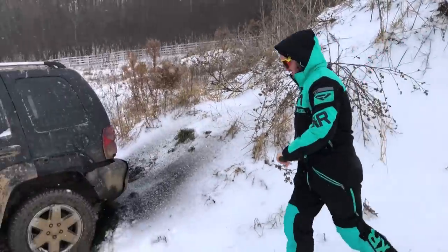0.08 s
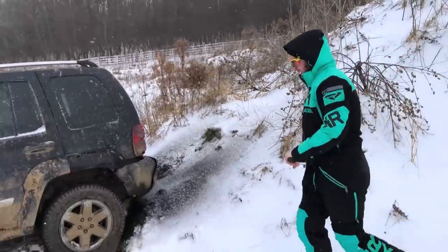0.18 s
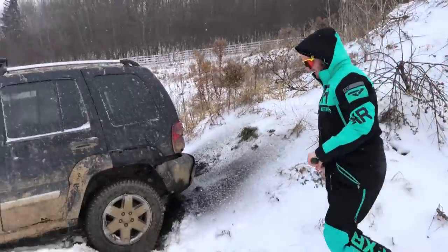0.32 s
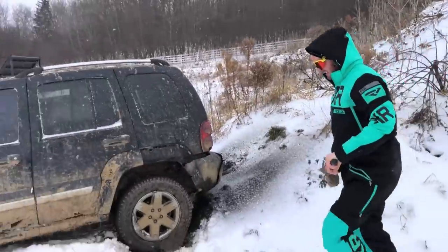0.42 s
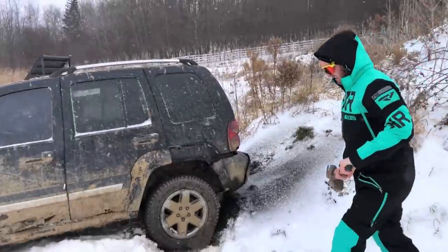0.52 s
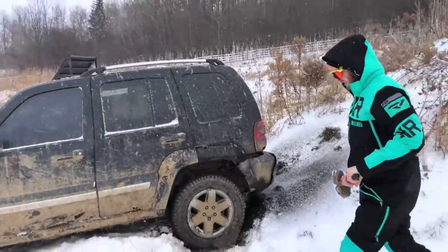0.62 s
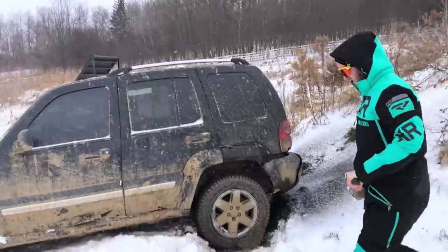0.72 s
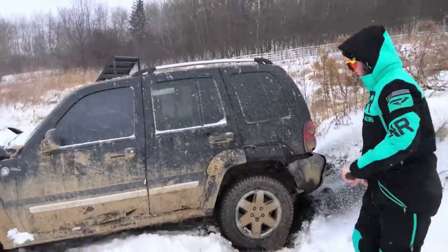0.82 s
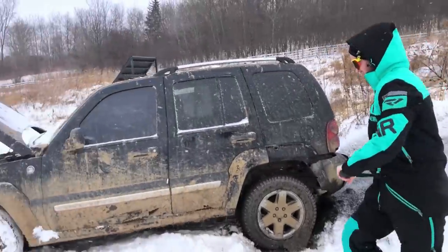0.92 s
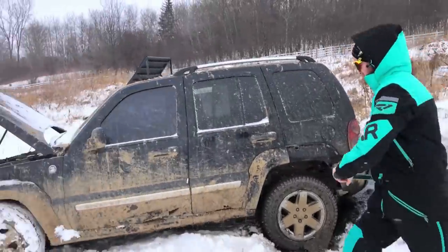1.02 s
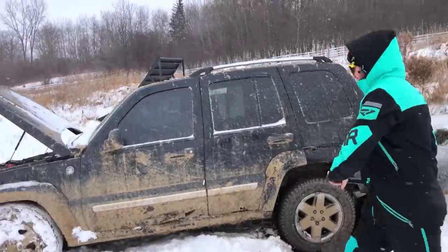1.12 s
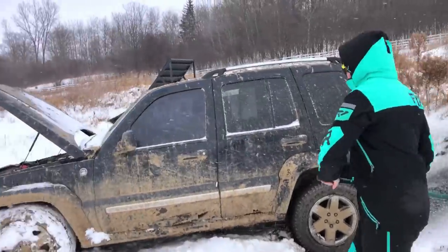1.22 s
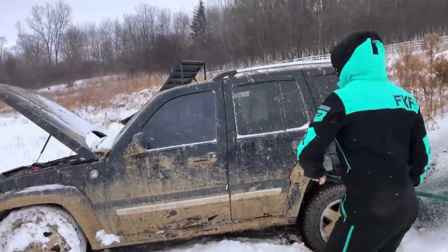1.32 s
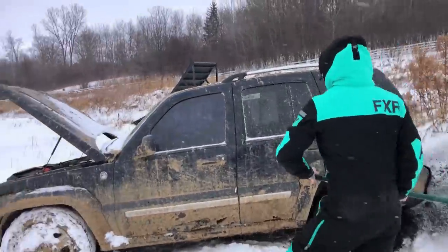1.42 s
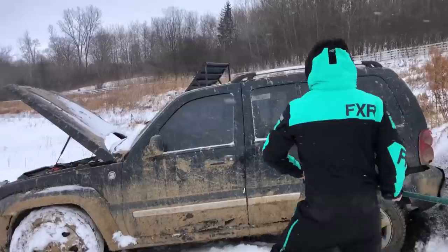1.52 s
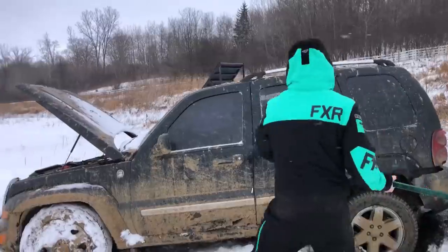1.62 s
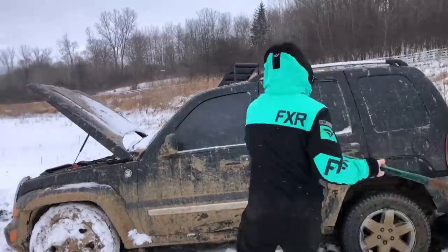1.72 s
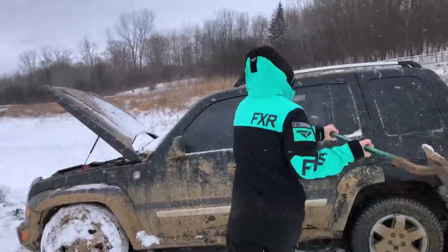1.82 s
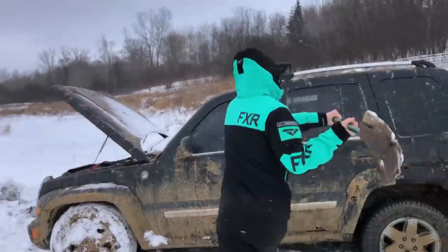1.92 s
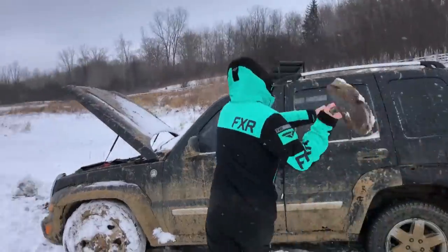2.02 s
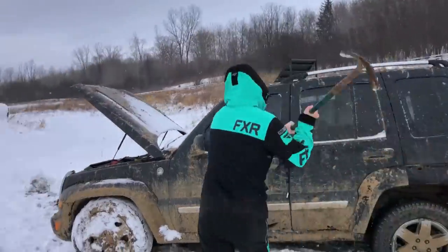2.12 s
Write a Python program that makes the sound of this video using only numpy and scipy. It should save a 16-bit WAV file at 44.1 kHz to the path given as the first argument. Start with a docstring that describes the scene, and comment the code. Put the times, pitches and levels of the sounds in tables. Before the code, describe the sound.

Boots crunch and creak through packed snow close by while an engine hums and whirrs outdoors

```python
"""Boots tread packed snow close by, while an engine runs throughout with a low hum and a throbbing whirr
that slowly grows louder. The snow gives way in creaking slips (short damped oscillations) over many small
collapsing grains (filtered random impulses), with low thuds, bass rumble and a faint hiss of loose powder.
A snowsuit swishes, ticks and squeaks (shaped noise and faint rings). The engine sums sines for its hum
with noise and noise-driven resonances for its whirr and whine. All is outdoors, without echo."""
import sys
import numpy as np
from scipy import signal
from scipy.fft import rfft, irfft
from scipy.io import wavfile
from scipy.ndimage import uniform_filter1d

SR = 44100
rng = np.random.default_rng(int(sys.argv[2]) if len(sys.argv) > 2 else 0)


def unload_wav(signal):
    """Save mono or channel-first audio to the path in sys.argv[1] as 16-bit WAV at rate SR, clipped to [-1, 1]."""
    wavfile.write(
        sys.argv[1],
        SR,
        np.round(np.clip(np.atleast_2d(signal).T, -1, 1) * 32767).astype(np.int16),
    )


N = 97020  # length in samples

# Partials of the engine hum: pitch_hz, rms_level_db
HUM_PARTIALS = [(62.8,-42),(94,-40.5),(137,-52.5),(275,-52),(502,-55.5)]
# Spectrum of the whirr's broad noise: frequency_hz, relative_level_db
WHIRR_SPECTRUM = [(65, 0.5), (110, -2), (188, -7.5), (274, -7.5), (358, -8.5), (499, -3), (666, -13),
                  (739, -8.5), (1140, -7), (1290, -12), (1400, -6.5), (1760, -11), (3420, -21),
                  (10900, -36), (15500, -51)]
# Narrow resonances in the whirr, before its slow rise and throb: pitch_hz, rms_level_db
WHIRR_RINGS = [(1136,-51.5),(1470,-56),(1653,-61.5),(1810,-52),(2050,-55.5),(2290,-56),(2541,-60),(2717,-61.5),(3098,-60.5)]
# Thin whine above the whirr, before the same rise and throb: pitch_hz, rms_level_db
WHINE_RINGS = [(6035,-83),(8592,-67.5)]
# Slow rise of whirr and whine: time_s, gain_db
WHIRR_RISE = [(0,-7),(.3,-5.5),(.6,-4),(1.0,-3),(1.4,-1),(1.8,0),(2.2,0.5)]

# Swishes of cloth, before the grain of the weave: centre_s, width_s, level_db
SWISHES = [(.432,0.0066,-45.5),(0.529,0.0041,-46),(.95,0.015,-51),(1.322,0.016,-45),(1.9042,0.002,-37),(1.921,0.011,-37),(2.16,0.072,-56)]
# Spectrum of the rubbing cloth: frequency_hz, relative_level_db
CLOTH_SPECTRUM = [(1200,-5),(2200,8.5),(2900,11.5),(4000,5.5),(5800,2),(8000,-0.5),(12000,-2),(15500,-16)]
# Spectrum of the small tick: frequency_hz, relative_level_db
TICK_SPECTRUM = [(2500,-14),(5500,-10),(8500,2),(11000,-6),(15500,-6)]
# Squeaks of cloth: peak_s, peak_level_db, pitch_hz
SQUEAKS = [(.143,-56,8900),(.69,-45,4460),(1.916,-42,5960),(1.921,-34.5,3050)]

# Level of the bass rumble under the steps: time_s, level_db
RUMBLE_LEVEL = [(0,-39),(.3,-39.5),(.7,-26.5),(1.08,-25),(1.2,-33),(1.3,-51.5),(1.6,-28.5),(1.75,-76),(2.2,-65)]
# Spectrum of the rumble: frequency_hz, relative_level_db
RUMBLE_SPECTRUM = [(20,-60),(40,-3.5),(65,0),(95,-1),(150,5.5),(400,-61.5)]
# Low thuds of the boots: peak_s, peak_level_db, pitch_hz
THUDS = [(.14,-22.5,74),(.37,-25.5,64.6),(.515,-22,63.7),(.585,-18.5,86),(.733,-13,77)]
# Airy hiss of loose snow kicked up by a boot: time_s, level_db
POWDER_LEVEL = [(.34,-85),(.39,-55),(.44,-55),(.54,-55.5),(.60,-63)]
# Spectrum of the powder: frequency_hz, relative_level_db
POWDER_SPECTRUM = [(3000,-18),(6000,-4),(12000,-2.5),(15500,-12)]
# Weight on the snow, as grain level before the lift GRAIN_DB: time_s, level_db
TREAD_WEIGHT = [(0,-47),(.19,-42.5),(.275,-31),(.35,-42.5),(.40,-34.5),(.49,-38.5),(.62,-32),(.70,-30),(.78,-24),(.90,-32),(.94,-26),(1.0,-29.5),
                (1.11,-23.5),(1.165,-25),(1.235,-26),(1.255,-42.5),(1.35,-46.5),(1.38,-38.5),(1.41,-49),(1.52,-50),(1.55,-29),(1.62,-61),(1.665,-41),(1.71,-60),(2.2,-50)]
# Spectrum of the grains, muffled by the snow above them: frequency_hz, relative_level_db
GRAIN_SPECTRUM = [(50,-32.5),(100,-15),(160,0),(260,-6.5),(520,-7.5),(800,-20.5),(1300,-28),(2200,-39.5),(5000,-103)]
# Strongest slips of the snow, before the muffling: peak_s, fundamental_level_db, pitch_hz
SLIPS = [(.2015,-14,580),(.232,-15.5,440),(.2708,-10,348),(.2801,-13.5,560),(.2845,-17,448),(.295,-32,520),(.317,-18,414),
         (.378,-24,480),(.385,-10.5,444),(.4034,-12.5,304),(.4118,-10,283),
         (.4389,-17.5,556),(.451,-14,217),(.4611,-16.5,350),(.5345,-16,320),(.556,-19,495),(.5765,-15,473),(.6085,-26,412),(.6121,-9.5,650),(.626,-15,265),
         (.6424,-16.5,443),(.6675,-20,403),(.7163,-10,710),(.724,-14.5,407),(.7309,-11,476),
         (.7475,-18,377),(.759,-10.5,228),(.773,-9.5,290),(.7856,-6.5,225),(.7961,-8,510),(.813,-15,460),(.8335,-15.5,347),(.845,-12,457),(.9255,-20.5,330),(.941,-7,228),
         (.979,-12,368),(1.0125,-9,417),(1.022,-7,231),(1.037,-17,850),(1.0401,-5.5,423),(1.045,-7.5,515),(1.0552,-5.5,660),(1.0595,-6,560),(1.0682,-10,272),(1.086,-5.5,533),(1.0983,-22,300),(1.1079,-7,444),
         (1.1151,-2.5,273),(1.1283,-10,208),(1.1517,-3.5,340),(1.1812,-6.5,516),(1.1923,-3.5,724),(1.1945,-8.5,1470),(1.196,-5,680),(1.203,-14,410),(1.2245,-8,194),(1.2369,-8.5,201),
         (1.378,-22,260),(1.5368,-12,287),(1.5454,-16,354),(1.5628,-16.5,210),(1.5777,-12,246),(1.5845,-9,313),(1.6098,-21,296),(1.655,-19.5,209),(1.6665,-20,231)]

WHIRR_DB, RING_WIDTH_HZ, THROB_DEPTH = -35.5, 16, 0.2
CLOTH_GRAIN_S, CLOTH_GRAIN_DB = 0.00067, 2.7
TICK_S, TICK_DB, TICK_DECAY_S = 0.4235, -32, 0.0022
SQUEAK_CYCLES, SQUEAK_ROUGH = 26, 0.04  # rise and decay; unevenness of pitch as a share
THUD_RISE_CYCLES, THUD_DECAY_CYCLES = 0.72, 0.58
POWDER_SPREAD_DB = 3.5  # unequal sizes of the falling crystals
GRAINS_PER_S, GRAIN_SPREAD_DB, GRAIN_DB = 2000, 4, 6.5
SLIP_RISE_CYCLES, SLIP_DECAY_CYCLES = 0.581, 0.94
SLIP_SAG, SLIP_ROUGH = 0.19, 0.19  # fall and unevenness of pitch, as shares
SLIP_EDGE_DB = -10.5  # octave overtone at the instant of breaking
SLIP_BODY_DB = -9.5  # the pack of snow gives way an octave below each slip
MUFFLE_HZ = 1470  # the snow above dulls the slips
LOW_CUT_HZ, TOP_HZ = 49, 15650


def undb(db):
    """Amplitude ratio from level: each 20 dB is a factor of ten."""
    return 10 ** (np.asarray(db) / 20)


def times():
    """Sampling principle: sample n lies at n / SR seconds."""
    return np.arange(N) / SR


def fader(points):
    """Gain that follows straight lines in decibels between (time_s, level_db) points."""
    time_s, level_db = np.array(points).T
    return undb(np.interp(times(), time_s, level_db))


def colour(x, points):
    """Minimum-phase filtering: a folded cepstrum makes the spectrum causal; the result has rms 1."""
    hz, db = np.array(points).T
    f = np.maximum(np.arange(N // 2 + 1) * SR / N, 1)
    gain = undb(np.interp(np.log(f), np.log(hz), db))
    gain = gain / np.sqrt(1 + (hz[0] / 2 / f) ** 4)  # roll-off an octave below the first point
    cepstrum = irfft(np.log(gain), N)
    cepstrum[1:N // 2] *= 2
    cepstrum[N // 2 + 1:] = 0
    y = irfft(rfft(x) * np.exp(rfft(cepstrum)), N)
    return y / y.std()


def noise(points):
    """White noise shaped by a spectrum, with rms 1."""
    return colour(rng.standard_normal(N), points)


def ring(hz):
    """Resonance: one complex pole driven by noise makes a narrow band, here of rms 1."""
    pole = np.exp((2j * hz - RING_WIDTH_HZ) * np.pi / SR)
    y = signal.lfilter([1], [1, -pole], rng.standard_normal(N)).real
    return y / y.std()


def damped_rings(table, rise, decay, sag=0, edge=0, rough=0, body=0):
    """Damped oscillation, timed in cycles: overtones peak with the envelope, and pitch wavers and sags."""
    out = np.zeros(N)
    waver = uniform_filter1d(rng.standard_normal(N), size=48)
    waver = rough * waver / waver.std()
    for at, db, hz in table:
        start = max(int((at - (2 + 2 * rise) / hz) * SR), 0)
        stop = min(int((at + 10 * decay / hz) * SR), N)
        i = np.arange(start, stop)
        cycles = (i / SR - at) * hz
        onset = np.exp(-(cycles / rise) ** 2)
        dying = np.exp(0.5 - np.hypot(0.5, cycles / decay))
        envelope = np.where(cycles < 0, onset, dying)
        pitch_hz = hz * (1 + waver[i] - sag * np.tanh(cycles))
        angle = 2 * np.pi * (rng.random() + np.cumsum(pitch_hz) / SR)
        tone = envelope * (np.cos(angle) + body * np.sin(angle / 2))
        overtone = edge * envelope ** 3 * np.sin(2 * angle)
        out[i] += undb(db) * (tone + overtone)
    return out


def engine():
    """Superposition and amplitude modulation: steady sines hum; noise and resonances throb with the firings."""
    t = times()
    hum = np.zeros(N)
    for hz, db in HUM_PARTIALS:
        hum += undb(db) * np.sqrt(2) * np.sin(2 * np.pi * (hz * t + rng.random()))
    whirr = undb(WHIRR_DB) * noise(WHIRR_SPECTRUM)
    whirr += sum(undb(db) * ring(hz) for hz, db in WHIRR_RINGS)
    whine = sum(undb(db) * ring(hz) for hz, db in WHINE_RINGS)
    firing_hz = HUM_PARTIALS[0][0] / 2
    throb = 1 + THROB_DEPTH * np.sin(2 * np.pi * firing_hz * t)
    return hum + (whine + whirr) * fader(WHIRR_RISE) * throb


def cloth_swishes():
    """Friction noise: stiff cloth brushes against itself, its level made grainy by the weave."""
    t = times()
    rub = sum(undb(db) * np.exp(-0.5 * ((t - at) / width) ** 2) for at, width, db in SWISHES)
    weave = uniform_filter1d(rng.standard_normal(N), int(CLOTH_GRAIN_S * SR))
    rub = rub * undb(CLOTH_GRAIN_DB * weave / weave.std())
    return rub * noise(CLOTH_SPECTRUM)


def small_tick():
    """Impulsive excitation: a sudden bright burst of noise decays exponentially."""
    t = times()
    decay = (t > TICK_S) * np.exp(-np.abs(t - TICK_S) / TICK_DECAY_S)
    return undb(TICK_DB) * decay * noise(TICK_SPECTRUM)


def snowsuit():
    """Superposition of cloth friction, one tick and faint squeaks ringing for many cycles."""
    squeaks = damped_rings(SQUEAKS, SQUEAK_CYCLES, SQUEAK_CYCLES, rough=SQUEAK_ROUGH)
    return cloth_swishes() + small_tick() + squeaks


def ground():
    """Heavily damped low oscillation: each thud dies within a few cycles, over a rumble of bass noise."""
    thuds = damped_rings(THUDS, THUD_RISE_CYCLES, THUD_DECAY_CYCLES)
    return thuds + noise(RUMBLE_SPECTRUM) * fader(RUMBLE_LEVEL)


def loose_powder():
    """Many unequal small impacts: falling crystals merge into an uneven hiss."""
    crystals = rng.standard_normal(N) * undb(POWDER_SPREAD_DB * rng.standard_normal(N))
    return colour(crystals, POWDER_SPECTRUM) * fader(POWDER_LEVEL)


def collapsing_grains():
    """Random impulse process: grains break at chance instants, louder as the weight on them grows."""
    breaks = rng.random(N) < GRAINS_PER_S / SR
    sizes = undb(GRAIN_SPREAD_DB * rng.standard_normal(N))
    clicks = breaks * rng.choice([-1, 1], N) * sizes
    return colour(clicks, GRAIN_SPECTRUM) * fader(TREAD_WEIGHT) * undb(GRAIN_DB)


def snow_slips():
    """Sudden yielding: each slip excites a short creaking oscillation, low-passed by the snow above."""
    slips = damped_rings(SLIPS, SLIP_RISE_CYCLES, SLIP_DECAY_CYCLES, SLIP_SAG,
                         undb(SLIP_EDGE_DB), SLIP_ROUGH, undb(SLIP_BODY_DB))
    muffling = signal.butter(4, MUFFLE_HZ, fs=SR, output="sos")
    return signal.sosfilt(muffling, slips)


def boots():
    """Superposition of ground, loose powder, collapsing grains and slipping snow."""
    return ground() + loose_powder() + collapsing_grains() + snow_slips()


def scene():
    """Free-field superposition: all sources add in the open air, without echo."""
    return (engine() + snowsuit() + boots())[None]


def record(dry):
    """Band limitation: the recorder cuts the deepest bass and the top."""
    bass_cut = signal.butter(3, LOW_CUT_HZ, "high", fs=SR, output="sos")
    top_cut = signal.ellip(10, 0.2, 80, TOP_HZ, fs=SR, output="sos")
    return signal.sosfilt(top_cut, signal.sosfilt(bass_cut, dry))


dry = scene()
out = record(dry)
unload_wav(out)
```